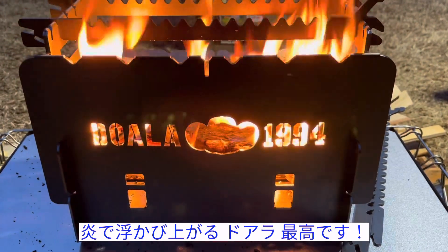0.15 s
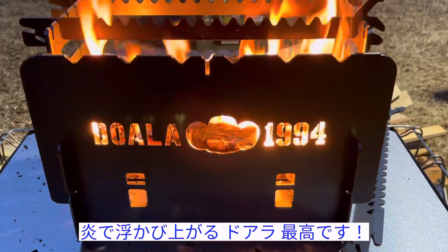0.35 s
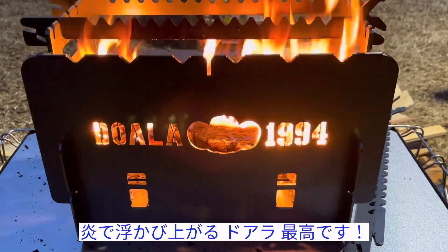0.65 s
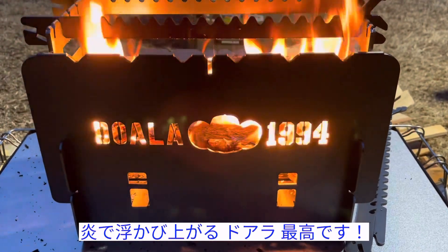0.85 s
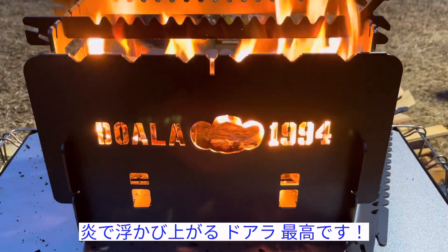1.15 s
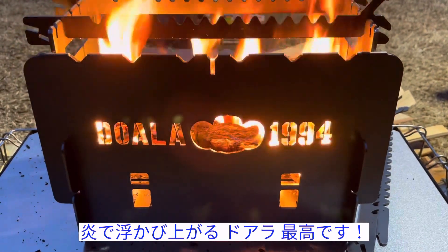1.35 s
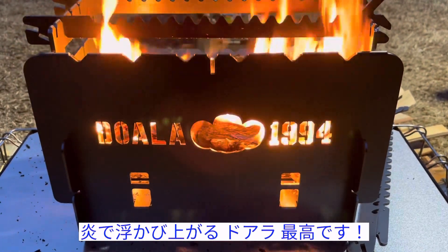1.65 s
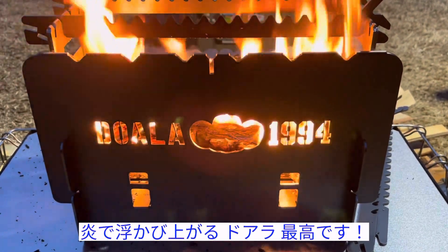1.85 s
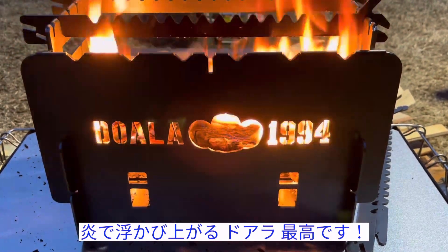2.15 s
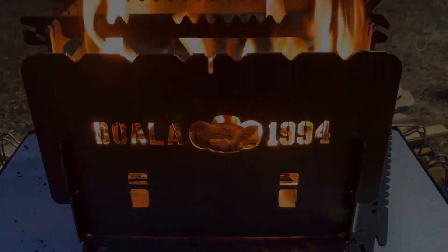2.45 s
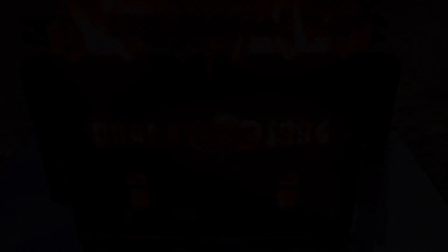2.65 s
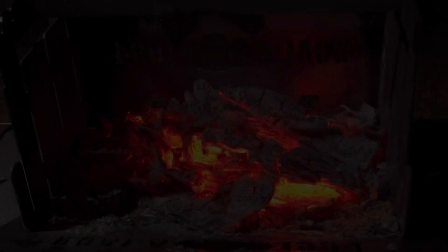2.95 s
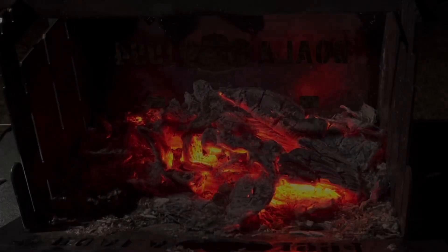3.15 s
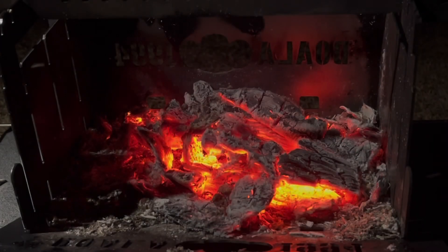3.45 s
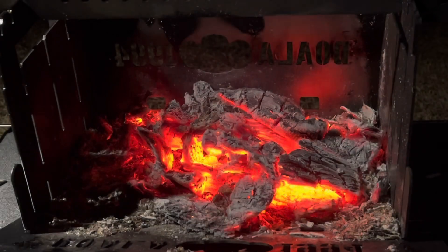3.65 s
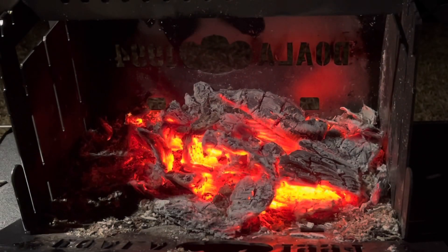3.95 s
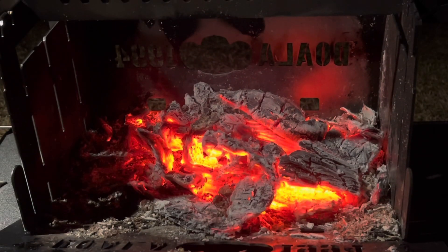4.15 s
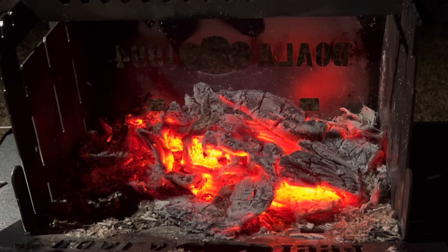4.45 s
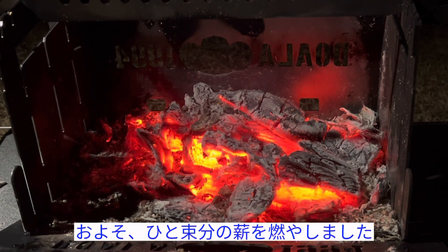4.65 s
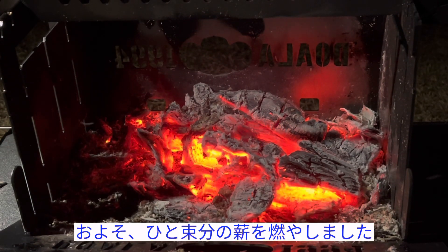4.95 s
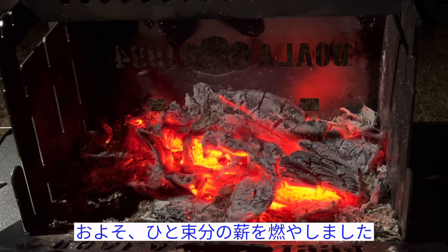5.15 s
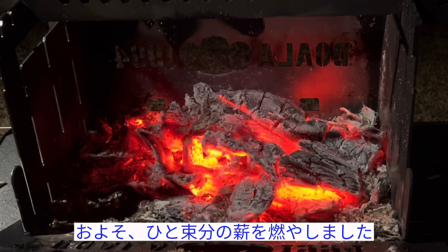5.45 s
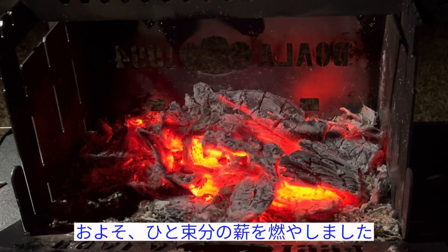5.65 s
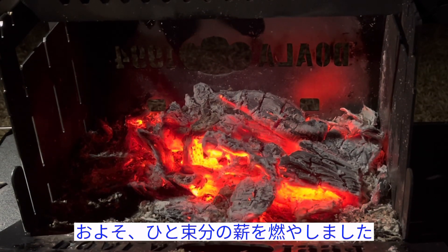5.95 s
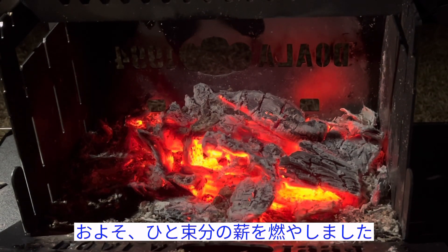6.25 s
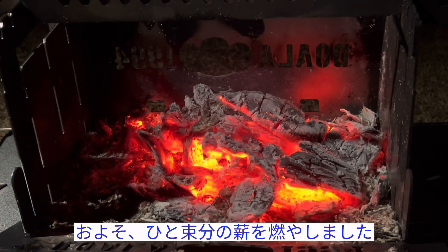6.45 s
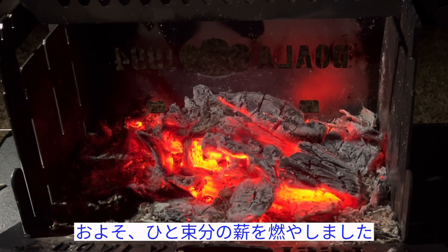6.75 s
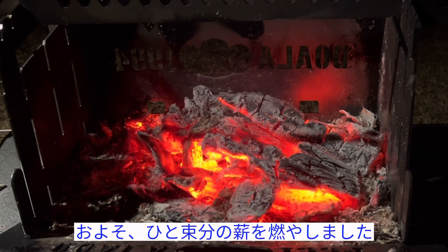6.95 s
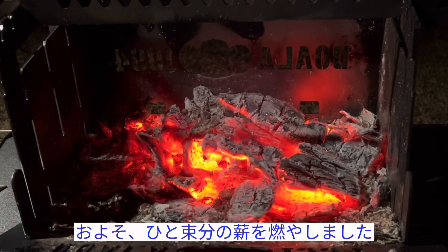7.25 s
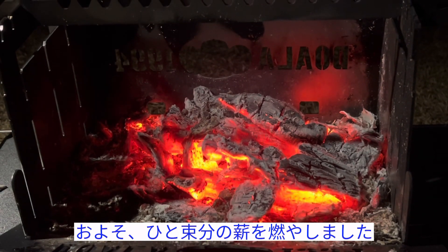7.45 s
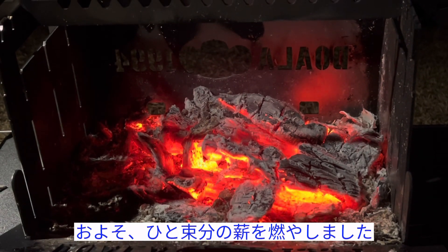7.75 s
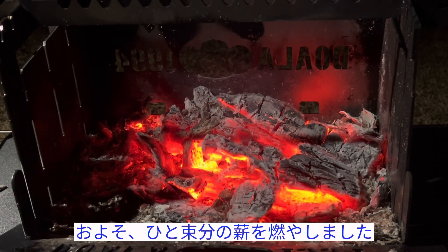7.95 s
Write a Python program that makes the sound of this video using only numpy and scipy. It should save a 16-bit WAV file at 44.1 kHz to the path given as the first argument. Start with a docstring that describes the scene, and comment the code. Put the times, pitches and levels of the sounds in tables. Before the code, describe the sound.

Outdoors, a phone close to a metal fire pit picks up rumbling, flickering flames, soft gas pats, sizzling wood and loud woody cracks with low thumps. Abruptly the blaze gives way to quiet embers that tick and fizz over faint open air. Distant ringing hammer blows come about twice a second, and a crisp pop snaps near the end.

```python
"""Flames rumble, puff and hiss around split logs in a steel fire pit, and the wood snaps loudly. Then the scene
changes: a bed of embers ticks and fizzes and now and then pops, while far off someone hammers a steel tent peg.
Snaps and ticks are torn noise with short resonances, gas is pushes and noise through the hollow firebox, air is
coloured noise, and the peg is a bank of fading modes. A phone stands close by, its two microphone ports ringing
in the treble."""
import sys
import numpy as np
from scipy import signal
from scipy.fft import rfft, irfft, next_fast_len
from scipy.io import wavfile
from scipy.ndimage import map_coordinates

SR = 44100
rng = np.random.default_rng(int(sys.argv[2]) if len(sys.argv) > 2 else 0)


def put_to_file(sound):
    """Save the sound as 16-bit audio at rate SR, in the file named by the first command-line argument."""
    columns = np.atleast_2d(sound).T  # one column per channel
    safe = np.clip(columns, -1, 1)
    whole_steps = np.round(safe * 32767)
    wavfile.write(sys.argv[1], SR, whole_steps.astype(np.int16))


N = 357651
EMBERS_FROM = 2.674  # s, when the scene changes from the blaze to the embers

# vigour of the flames, in surges and lulls: time_s, flutter_db (before flicker)
FLAMES = [(0.0, -70), (0.1, -67.5), (0.19, -67), (0.25, -70), (0.4, -61.5), (0.58, -68.5), (0.67, -62.5),
          (0.8, -68), (0.88, -76.5), (1.05, -60.5), (1.16, -69), (1.28, -66), (1.6, -66), (1.78, -75),
          (1.94, -61.5), (2.11, -71.5), (2.28, -66), (2.48, -71.5), (2.66, -65)]


def amp(db):
    """Decibels to gain."""
    return 10 ** (np.asarray(db) / 20)


def unit(x):
    """x at rms 1."""
    return x / np.sqrt(np.mean(x ** 2) + 1e-20)


def burst(x):
    """A short sound with the energy of 10 ms at rms 1."""
    return x / np.sqrt(np.sum(x ** 2) / (SR / 100) + 1e-20)


def along(points, hz):
    """(Hz, value) points read along a log frequency axis."""
    f, v = np.transpose(points)
    return np.interp(np.log(hz + 1), np.log(f + 1), v)


def curve(rows):
    """(s, value) points as one value per sample."""
    return np.interp(np.arange(N) / SR, *np.transpose(rows))


def wobble(rate):
    """A smooth random curve, rate knots a second."""
    knots = rng.standard_normal(int(N * rate / SR) + 4)
    return map_coordinates(knots, [np.arange(N) * rate / SR])


def filtered(x, response):
    """x times a complex response of frequency."""
    m = 2 * next_fast_len(N // 2 + SR // 4)
    return irfft(rfft(x, m) * response(np.fft.rfftfreq(m, 1 / SR)), m)[..., :N]


def causal(gain):
    """The response with this gain that only rings after its cause (minimum phase)."""
    cepstrum = irfft(np.log(gain))
    half = len(cepstrum) // 2
    cepstrum[1:half] *= 2
    cepstrum[half + 1:] = 0
    return np.exp(rfft(cepstrum))


def colour(x, spectrum, pitch):
    """A short sound through a causal colour, its frequencies multiplied by pitch."""
    hz = np.fft.rfftfreq(2 * len(x), 1 / SR)
    response = causal(amp(along(spectrum, hz / pitch)))
    return irfft(rfft(x, 2 * len(x)) * response)[:len(x)]


def noise(spectrum):
    """Noise of rms 1 with a given colour."""
    return unit(filtered(rng.standard_normal(N), lambda hz: amp(along(spectrum, hz))))


def band(x, lo_hz, hi_hz, order=2):
    """Causal band-pass."""
    sos = signal.butter(order, [lo_hz, min(hi_hz, .48 * SR)], "band", fs=SR, output="sos")
    return signal.sosfilt(sos, x)


def add(track, s, sound):
    """Mix a sound in at time s."""
    start = max(round(s * SR), 0)
    part = track[..., start:start + sound.shape[-1]]
    part += sound[..., :part.shape[-1]]


def sparks(rate, size_db, spread_db):
    """Random impulses, rate a second: many small ones and a few large."""
    chance = rng.random(N)
    size = np.minimum(rng.exponential(size=N), 3)
    return (chance < rate / SR) * amp(size_db + spread_db * size) * rng.choice([-1, 1], N)


def blazing():
    """1 while the flames burn, 0 over the embers."""
    return 1. * (np.arange(N) / SR < EMBERS_FROM)


def surge():
    """Surges and lulls of the flames, in dB about the mean of their table."""
    return curve(FLAMES) - np.mean([db for s, db in FLAMES])


def glow():
    """Base level in dB per sample: sap boils while the logs blaze; the embers fizz faintly."""
    # fizzing of the hot wood, before the trims below: time_s, level_db
    sap = [(0.0, -73.5), (0.45, -69), (0.7, -69.5), (0.87, -68.5), (1.16, -74.5), (1.36, -67.5),
           (1.55, -71.5), (1.76, -69), (1.95, -69.5), (2.27, -68.5), (2.5, -70.5), (2.66, -70.5)]
    fizz = [(2.7, -81.5), (2.88, -80), (3.13, -76), (3.88, -79.5), (4.94, -77), (5.91, -81.5), (6.06, -78),
            (7.99, -82.5), (8.11, -80.5)]
    return np.where(blazing(), curve(sap) + 5.5, curve(fizz) + 2)


def fracture(t, t60, rattle_db, rattle_t60):
    """Fibres tear in a brief burst of noise; the steel walls throw the sound about a little longer."""
    return rng.standard_normal(len(t)) * (amp(-60 * t / t60) + amp(rattle_db - 60 * t / rattle_t60))


def firebox(push, pitch=0.98):
    """A push of gas rings the hollow between the logs and the steel walls."""
    # resonance of the hollow at pitch 1: frequency_hz, gain_db
    hollow_modes = [(50, -18.5), (140, -3.5), (200, -7), (260, -14), (330, -3), (450, 2), (650, -3),
                    (850, -10), (1060, -13.5), (1300, -17.5), (1600, -16), (2200, -30.5), (5000, -59)]
    return colour(push, hollow_modes, pitch)


def pops():
    """Each pocket of steam bursts with a bright snap, a woody crack and a low thump; the freed gas flares."""
    # bursts of steam in the wood, levels as 10 ms rms before the trims and colours below:
    # time_s, snap_db, snap_centre_hz, crack_db, the splinter's first_mode_hz, second_mode_hz,
    # second_mode_db (against the first), third_mode_hz, third_mode_db (against the first),
    # thump_db, left_db (crack, left over right)
    steam_bursts = [(0.2714, -61.5, 8700.0, -58, 4670.0, 3140, -8.5, 5430, -8, -53, 1),
                    (0.3758, -37.5, 11500, -56.5, 4370, 5400, -7, 2780.0, -17.5, -59, 1.5),
                    (0.4035, -46.5, 9200.0, -52.5, 4940.0, 6600, 1, 3400, -4, -60, 3),
                    (0.4739, -43.5, 10200, -47, 6020, 3420, -20.5, 4930, -8, -52, 2),
                    (0.4886, -46, 10800, -53, 4900.0, 3340.0, -7, 6300, 4, -61, 0),
                    (0.5118, -41, 9135, -44, 3000, 3880, 1, 4500, -5, -50, 1),
                    (0.6142, -41.5, 8900, -54, 5520.0, 4570.0, -8, 6300.0, -7, -49.5, 3.5),
                    (0.6232, -35.5, 9200.0, -45, 6400, 5400, -12.5, 4620.0, -25, -44.5, 4),
                    (0.9637, -21, 9100, -24.5, 2800, 4660, -1.5, 3280, -8, -26.5, 2.5),
                    (1.3614, -28.5, 9700, -33, 3320, 6050.0, -14, 4460, -35, -32, 1),
                    (1.4405, -36, 8500, -45, 5330.0, 6600, -1, 2780.0, -0.5, -52, 1),
                    (1.8443, -45.5, 8200.0, -51.5, 4770.0, 2940, -2, 3900, -2, -54, 1.5),
                    (2.0741, -43.5, 8600, -55, 5860, 4680.0, -9, 3490.0, -16, -58, 2),
                    (2.2044, -40, 8860, -66, 5500, 4160.0, 0, 3230.0, -18, -88, 0),
                    (2.333, -48.5, 9100, -58.5, 3830, 4660, -3, 6600, -9.5, -89, 1),
                    (2.639, -44.5, 10300, -46.5, 5960.0, 5100, -3, 3510.0, -14, -53.5, 1),
                    (4.501, -43.5, 10300.0, -49.5, 4190.0, 6550, 0.5, 2900, -4.5, -86.5, 0),
                    (7.4858, -27.5, 10220, -32.5, 4110, 5100, -2.5, 2370, -2, -67.5, -1.5)]
    # colour of a splitting log at pitch 1: frequency_hz, gain_db
    log_colour = [(500, -28), (1200, -16), (1800, -14), (2400, -4.5), (3000, -1.5), (4000, -2.5),
                  (5000, -5), (6300, -4.5), (8000, -17.5), (12000, -38)]
    ring_db = 4  # splinter against the tearing
    flare_db, flare_t60 = -16.5, 0.18  # dB against the thump; dying time in s
    lead_s, lead_db = 0.016, -24.5  # faint soft low puff heard just before each pop: lead; dB against the thump
    sides = np.array([[.5], [-.5]])  # left, right
    out, t = np.zeros((2, N)), np.arange(SR // 3) / SR
    for (s, snap_db, snap_hz, crack_db, first_hz, second_hz, second_db,
         third_hz, third_db, thump_db, left_db) in steam_bursts:
        spit = fracture(t, t60=.005, rattle_db=-17, rattle_t60=.028)
        snap = band(spit, .82 * snap_hz, 1.12 * snap_hz) + .5 * band(spit, 11500, 13500)
        tear = colour(fracture(t, t60=0.0016, rattle_db=-11.5, rattle_t60=0.026), log_colour, 0.95)
        ring = splinter(t, [(first_hz, 0), (second_hz, second_db), (third_hz, third_db)])
        crack = burst(burst(tear) + amp(ring_db) * ring)
        flare = burst(firebox(rng.standard_normal(len(t)) * amp(-60 * t / flare_t60), 0.9))
        add(out, s, amp(snap_db - 4.5) * burst(snap))
        add(out, s, amp(thump_db) * (thump(t) + amp(flare_db) * flare))
        add(out, s, amp(crack_db + left_db * sides) * crack)
        lead_puff = burst(firebox(amp(-60 * t / 0.0064)))
        add(out, s - lead_s, amp(thump_db + lead_db) * lead_puff)
        strength = np.hypot(amp(crack_db), amp(snap_db - 5.0))
        add(out, s, amp(-29.0) * strength * np.array([outdoors(t), outdoors(t)]))
    return out


def splinter(t, modes):
    """A freed splinter, jolted once, rings very briefly in its own (Hz, dB) modes."""
    half_hz = 150  # half the width of a mode
    jolt = (1 - np.exp(-t / .0002)) * np.exp(-t / .00004)
    ring = sum(amp(db) * burst(band(jolt, hz - half_hz, hz + half_hz, order=1)) for hz, db in modes)
    return burst(band(ring, 2150, 12000))


def thump(t):
    """The escaping gas pushes hard, then slackens: a knock that falls in pitch and stirs firebox and walls."""
    # the steel walls: frequency_hz, width_hz, level_db (before the wall mix below)
    wall_modes = [(1123, 79, -10), (1595, 160, -8)]
    hz = 135 + 950 * np.exp(-t / .003 + .08 * rng.standard_normal())
    push = (1 - np.exp(-t / .0015)) * (amp(-60 * t / .014) + amp(-30 - 60 * t / .08))
    knock = burst(push * np.sin(2 * np.pi * np.cumsum(hz) / SR))
    hollow = burst(firebox(fracture(t, t60=0.013, rattle_db=-19.0, rattle_t60=0.044), 1.1))
    walls = sum(amp(db) * burst(np.sin(2 * np.pi * f * t) * np.exp(-np.pi * width * t))
                for f, width, db in wall_modes)
    return burst(knock + 1.1 * hollow - .85 * walls)


def outdoors(t):
    """The faint, quickly fading answer of the ground and the things standing around."""
    swell = 1 - np.exp(-t / 0.0048)
    return burst(band(rng.standard_normal(len(t)), 1200, 9000, order=1) * amp(-60 * t / 0.23) * swell)


def crackle():
    """Clear ticks over many tiny random splits in the char, which the flames' lulls thin out."""
    # short clear ticks, a few of them the sharp edge of a hammer blow, levels as 10 ms rms:
    # time_s, snap_db, crack_db, ring_hz
    clear_ticks = [(0.059, -58.5, -68, 6600), (0.0733, -63, -61, 3070), (0.13, -62.5, -70.5, 5280),
                   (0.296, -61, -71, 6498), (0.6803, -61, -64, 5090), (0.703, -59.5, -64, 6060),
                   (0.77, -65, -65.5, 4350), (0.786, -55.5, -68, 5960), (0.9886, -59, -53, 5670),
                   (1.238, -66.5, -66.5, 3600), (1.2574, -58, -74, 5300), (1.4238, -64.5, -79, 4300),
                   (1.5184, -60.5, -68.5, 3880), (1.5545, -60.5, -58, 6100), (1.6272, -62.5, -70, 3180),
                   (1.6798, -63, -65, 3505), (2.05, -61.5, -69, 5800), (2.1329, -63, -69, 6670),
                   (2.1678, -58.5, -61.5, 5300), (2.1846, -58, -63.5, 6070), (2.3195, -64.5, -80, 6600),
                   (2.4607, -56, -66.5, 4820), (2.476, -71, -65, 5630), (2.611, -58, -62.5, 6400),
                   (2.7871, -61.5, -76, 4210), (2.911, -65, -74.5, 4230), (3.0525, -58.5, -67, 4560),
                   (3.072, -63, -75, 6150), (3.0998, -55, -70, 5200), (3.118, -59, -69, 4230),
                   (3.2606, -55, -76, 6390), (3.3645, -59, -67, 6040), (3.572, -75, -72, 2740),
                   (3.6574, -66, -79, 4130), (3.7278, -68.5, -78, 2860), (3.86, -70, -78, 2970),
                   (4.0365, -75, -74.5, 2910), (4.0914, -56.0, -65, 5400), (4.2175, -60.5, -84, 5370),
                   (4.2428, -65, -81, 3750), (4.3586, -61.5, -68, 2750), (4.368, -59.5, -69.5, 3050),
                   (4.3959, -52, -66, 2880), (4.6701, -66.5, -82.5, 6160), (4.9472, -60, -70.5, 4000),
                   (5.0047, -65, -79.5, 4460), (5.0254, -64.5, -91, 5900), (5.11, -72, -78.5, 2950),
                   (5.3672, -75, -74, 2900), (5.732, -66.5, -85, 2650), (5.83, -76, -78, 4260),
                   (5.9986, -65, -81.5, 2800), (6.1362, -60.5, -76, 2920), (6.25, -73.5, -77.5, 2900),
                   (6.373, -69.5, -76, 2920), (6.429, -71, -79, 4060), (6.438, -64, -87, 4360),
                   (6.5765, -59, -68, 4340), (6.623, -63, -69, 6300), (6.661, -59.5, -67.5, 4240),
                   (6.6817, -59, -66, 4100), (6.8828, -74.5, -74, 2710), (7.0448, -66.5, -76, 4260),
                   (7.1198, -59.5, -68.5, 6200), (7.184, -63.5, -75.5, 4330), (7.5696, -54.5, -71.5, 4130),
                   (7.592, -64, -69.5, 4410), (7.6746, -64.5, -67, 5400)]
    flame_rate, flame_db = 30, -76.5  # base splits a second; dB of the smallest
    ember_rate, ember_db = 42, -3.5  # base splits a second; dB of the smallest against glow()
    out, fire = np.zeros(N), blazing()
    for s, snap_db, crack_db, ring_hz in clear_ticks:
        add(out, s, tick(s, snap_db, crack_db, ring_hz))
    clumps = np.exp(.3 * wobble(5))
    vigour = amp(surge() / 2)  # lulls crackle less
    flaming = sparks(flame_rate * clumps * vigour, flame_db, spread_db=5.5)
    glowing = amp(glow()) * sparks(ember_rate * clumps, ember_db, spread_db=2.5)
    hits = fire * flaming + (1 - fire) * glowing
    for i in np.flatnonzero(hits):
        woody = np.clip(rng.standard_normal(), -2, 2)
        # borrow a ring from the clear ticks of the same stage of the fire
        ring_hz = rng.choice([row[3] for row in clear_ticks if (row[0] < EMBERS_FROM) == fire[i]])
        add(out, i / SR, hits[i] * tick(i / SR, 0, -10 + 2.8 * woody, ring_hz))
    return out


def tick(s, snap_db, crack_db, ring_hz):
    """One tick at time s: a thin snap, and a woody crack that rings for a moment."""
    t = np.arange(SR // 40) / SR
    tear = fracture(t, t60=.0065, rattle_db=-13, rattle_t60=.045) * (1 - np.exp(-t / .0004))
    centre_hz = 9200 if s < EMBERS_FROM else 10970  # dry char ticks higher than burning wood
    snap_hz = centre_hz * np.exp(0.079 * np.clip(rng.standard_normal(), -2, 2))
    snap = burst(band(tear, .8 * snap_hz, 1.2 * snap_hz))
    ring = burst(np.sin(2 * np.pi * ring_hz * t) * amp(-60 * t / .015))
    crack = burst(burst(band(tear, 2600, 6800, order=3)) + amp(-3.0) * ring)
    return amp(snap_db) * snap + amp(crack_db) * crack


def puffs():
    """Gas ignites in soft, dull pats: clear ones, each at its own pitch, over a patter that follows the flames."""
    # the larger pockets of gas catching fire: time_s, level_db (10 ms rms), centre_hz
    gas_pockets = [(0.049, -65, 537), (0.156, -57, 336), (0.179, -61, 337), (0.203, -57.5, 366),
                   (0.326, -60.5, 450), (0.358, -53, 550), (0.369, -57.5, 533), (0.544, -57.5, 570),
                   (0.648, -48.5, 483), (0.709, -56.5, 356), (0.784, -60.5, 450), (0.805, -61.5, 615),
                   (1.104, -52.5, 470), (1.155, -66.5, 380), (1.25, -61, 454), (1.292, -64.5, 430),
                   (1.51, -54, 510), (1.672, -53.5, 540), (1.828, -56.5, 474), (1.895, -56.5, 306),
                   (1.996, -57, 423), (2.012, -54, 520), (2.149, -57, 527), (2.256, -61, 415),
                   (2.274, -57, 475), (2.284, -62, 475), (2.299, -53.5, 528), (2.327, -61, 434),
                   (2.417, -53.5, 455), (2.463, -72, 458), (2.525, -53.5, 674), (2.537, -51.5, 624),
                   (2.583, -53.5, 550), (2.624, -50.5, 406)]
    plain_hz = 520  # centre of a puff that leaves the firebox at pitch 1
    out, t = np.zeros(N), np.arange(SR // 12) / SR
    for s, db, hz in gas_pockets:
        push = amp(-60 * t / .001) + .6 * fracture(t, t60=.03, rattle_db=-16, rattle_t60=.06)
        add(out, s, amp(db) * burst(firebox(push, hz / plain_hz)))
    pat = burst(firebox(amp(-60 * t / 0.02), 0.6))
    # 100 pats a second, the smallest 8 dB under the flames' table
    patter = sparks(100, -8, spread_db=3.5) * amp(curve(FLAMES)) * blazing()
    return out + signal.fftconvolve(patter, pat)[:N]


def flutter():
    """Flames flutter: low noise whose level surges with the fire and flickers fast."""
    # relative colour of the flames: frequency_hz, density_db (per Hz)
    flame_colour = [(60, -15.5), (125, 9.5), (185, 3.5), (245, -7.5), (380, -1.5), (600, -14),
                    (1000, -23.5), (2000, -29.5), (5000, -29.5), (10000, -48)]
    flicker_db = 8 * np.tanh(7.4 * wobble(36))  # at most 8 dB either way
    return amp(curve(FLAMES) + flicker_db) * noise(flame_colour) * blazing()


def rumble():
    """Rising air rumbles in uneven surges, slightly different at each port."""
    # relative colour of the rumble: frequency_hz, density_db (per Hz)
    rumble_colour = [(20, -36), (35, -24.5), (50, 2), (66, -2.5), (95, -4), (125, -17.5), (180, -30.5),
                     (400, -44.5), (1000, -100)]
    # strength of the rising air, before trim and wobble: time_s, level_db
    updraught = [(0.0, -69.5), (0.13, -59.5), (0.92, -59.5), (1.02, -52), (1.11, -64), (1.35, -62),
                 (1.38, -49), (1.47, -63), (1.83, -62), (1.92, -56), (2.62, -62.5), (3.07, -53.5),
                 (3.3, -61.5), (5.99, -63.5), (7.2, -59.5), (7.3, -67), (8.06, -56.5), (8.11, -75.5)]
    eddies = np.array([noise(rumble_colour), noise(rumble_colour)])
    air = noise(rumble_colour) + amp(-21) * eddies
    return amp(curve(updraught) + 0.45 + 1.4 * wobble(16) + 1.2 * wobble(24)) * air


def hiss():
    """Hot wood fizzes: bright noise that sizzles and partly follows the flames' surges and lulls."""
    # relative colour of the hiss: frequency_hz, density_db (per Hz)
    hiss_colour = [(300, -33.5), (1200, -11), (2500, -7), (5000, -3.5), (8000, 1), (11300, 3), (13000, -8),
                   (16000, -17)]
    surge_db = .3 * surge() * blazing()
    sizzle_db = 1.0 * wobble(6) + 2.2 * wobble(35) + 1.0 * wobble(420)
    return amp(glow() + surge_db + sizzle_db - 7.0) * noise(hiss_colour)


def hammer():
    """Far blows arrive as a noisy clack and the peg's fading modes, smeared by the surroundings."""
    # hammer blows: time_s, level_db (before trim), favoured_hz (modes this blow lifts),
    # high_db (the highest modes: a glancing blow has less)
    blows = [(2.713, -68.5, 950, -2), (3.001, -69.5, 2830, -3), (3.424, -67.5, 2820, 1.5),
             (3.915, -69, 2820, 0.5), (4.353, -67, 2820, 2.5), (4.782, -68.5, 2830, -7),
             (5.195, -70, 2540, -4.5), (5.612, -68.5, 2496, -6.5), (6.062, -66.5, 2793, -4.5),
             (6.702, -66.5, 2914, -2), (7.242, -68, 2800, -2), (7.596, -70, 2860, -0.5),
             (7.927, -73.5, 2000, -2.5)]
    # modes of the peg before each blow's lift: frequency_hz, level_db
    peg_modes = [(908, -2.5), (935, 0.5), (969, -9), (1086, -4), (1168, -8), (1260, -8), (1295, -5),
                 (1369, -12), (1515, -14.5), (1643, -7.5), (1760, -7), (1978, -0.5), (2165, -7),
                 (2225, -11.5), (2254, -10.5), (2326, -9), (2427, -13.5), (2533, -7.5), (2735, -4.5),
                 (2828, -4.5), (2904, -8), (2947, -12), (3083, -8.5), (3231, -16), (3296, -10.5),
                 (3663, -8), (3776, -7.5), (4230, -7), (4275, -10.5), (4338, -1.5), (4480, -17),
                 (5160, -14), (5750, -14), (6420, -7)]
    # the hammer's noisy contact at pitch 1: frequency_hz, gain_db
    clack_colour = [(500, -17), (900, -0.5), (1500, -7.5), (2200, -4), (3000, -8.5), (4200, -10.5),
                    (4700, -14), (6300, -12.5), (9000, -17), (12000, -42)]
    peg_t60, damping = 0.52, 0.14  # s at 2 kHz; power of frequency by which higher modes die sooner
    rise_s = 0.0035  # swell of a mode at 2 kHz; lower ones take longer
    favour_db, favour_octaves = 5.5, 0.12  # how much, and how widely, the place of the blow lifts modes
    high_modes_hz = 3700  # only a square blow rings the peg fully above this
    waver = 0.69  # scattered paths against the straight one
    clack_db, clack_t60 = -5, 0.39  # starting dB before its swell; s
    out, t = np.zeros(N), np.arange(SR // 2) / SR
    hz, db = np.transpose(peg_modes)
    count = len(peg_modes)
    lowness = 2000 / hz[:, None]
    fade = amp(-60 * t / (peg_t60 * lowness ** damping)) * (1 - np.exp(-t / (rise_s * lowness ** 2)))
    modes = np.exp(2j * np.pi * hz[:, None] * t) * fade
    for s, blow_db, favoured_hz, high_db in blows:
        octaves = np.log2(hz / favoured_hz)
        lift_db = favour_db * np.exp(-.5 * (octaves / favour_octaves) ** 2) + high_db * (hz > high_modes_hz)
        size = amp(db + lift_db + 2.5 * rng.standard_normal(count))
        strength = size * np.exp(2j * np.pi * rng.random(count))
        # scattered paths make each mode waver in size and phase
        knots = rng.standard_normal((count, 18)) + 1j * rng.standard_normal((count, 18))
        paths = signal.resample(knots, len(t), axis=1)
        ring = (strength @ ((1 + waver * paths) * modes)).real / np.linalg.norm(strength)
        contact = unit(colour(rng.standard_normal(len(t)), clack_colour, 0.946))
        clack = contact * amp(clack_db - 60 * t / clack_t60) * (1 - np.exp(-t / 0.0034))
        add(out, s, amp(blow_db + 2.5) * (ring + clack))
    return out


def open_air():
    """Faint steady noise of the open air, reaching each port partly on its own."""
    # relative colour of the air: frequency_hz, density_db (per Hz)
    air_colour = [(60, -5), (160, 4.5), (300, -3.5), (550, -8.5), (1000, -10.5), (1800, -19), (4000, -30),
                  (8000, -34.5), (16000, -31.5)]
    shared = amp(-77.5) * noise(air_colour)
    return shared + amp(-82.5) * np.array([noise(air_colour), noise(air_colour)])


def scene():
    """The fire, the far hammer and the open air together."""
    fire = pops() + crackle() + puffs() + flutter() + rumble() + hiss()
    return fire + hammer() + open_air()


def record(dry):
    """The ports ring near 10 kHz, out of step with each other; nothing is kept above the band limit."""
    # the phone's treble resonance: frequency_hz, gain_db
    port_ring = [(6800, 0), (7800, 1), (8700, 2.5), (9600, 6), (10500, 11), (11300, 7), (12000, -3.5),
                 (12700, -6.5), (13500, -17.5), (15200, -6.5), (16500, -22)]
    # how the two ports differ: frequency_hz, left_lead_rad
    port_phase = [(60, .1), (500, .2), (1300, .55), (3200, .7), (5000, .45), (7000, .1), (8100, .5),
                  (8790, -.2), (9220, -1.4), (10250, -3.14), (11600, -5.9), (13200, -8.7), (16400, -13)]
    # and in level: frequency_hz, left_over_right_db
    port_balance = [(60, 0.5), (130, 0.5), (290, 1.5), (640, 1), (1410, 1.5), (3100, -0.5), (6820, 0.5),
                    (15000, 0.5)]
    top_hz = 16500

    def phone(hz):
        """Response of the left and right ports."""
        half = np.array([[.5], [-.5]])
        ports = amp(along(port_balance, hz) * half) * np.exp(1j * along(port_phase, hz) * half)
        return causal(amp(along(port_ring, hz))) * ports * (hz < top_hz)
    return filtered(dry, phone)


dry = scene()
out = record(dry)
put_to_file(out)
```